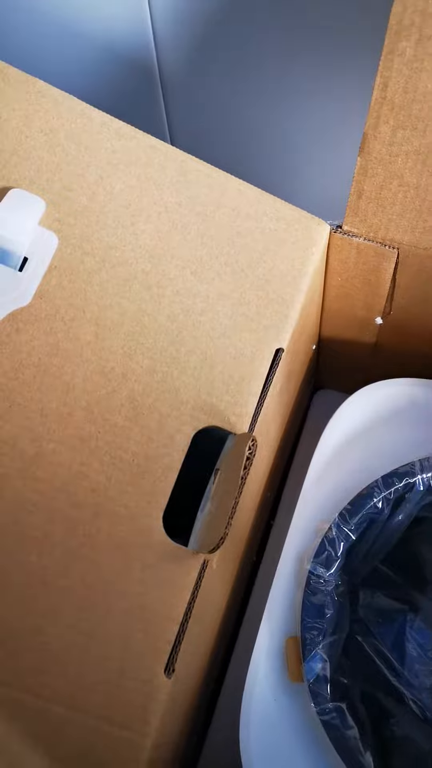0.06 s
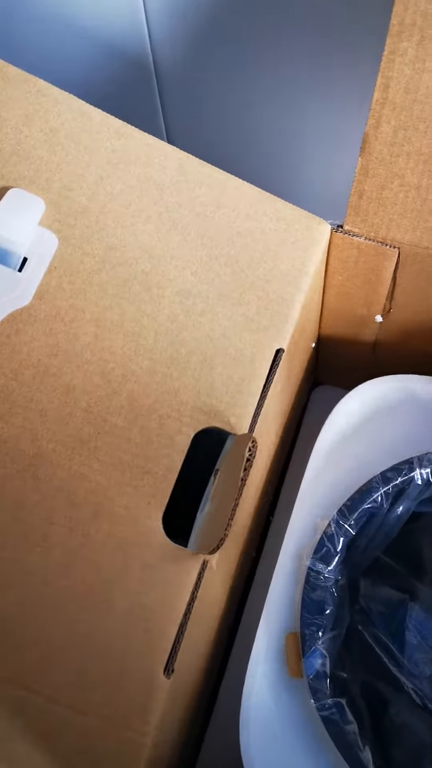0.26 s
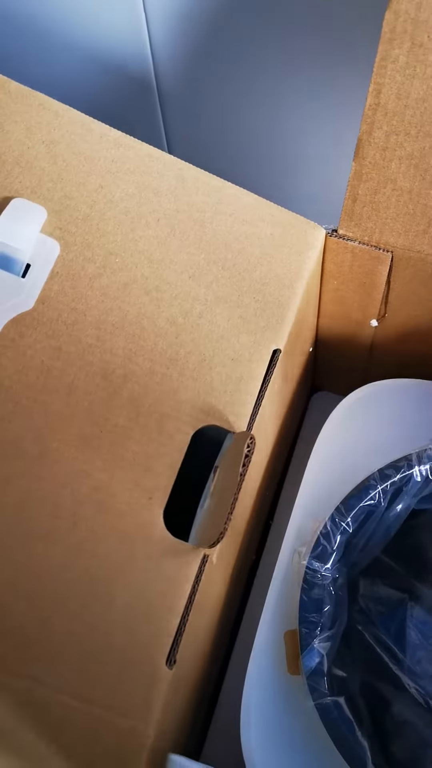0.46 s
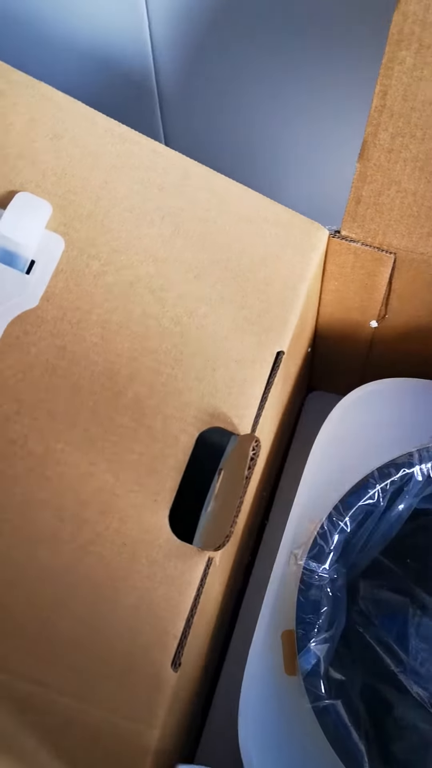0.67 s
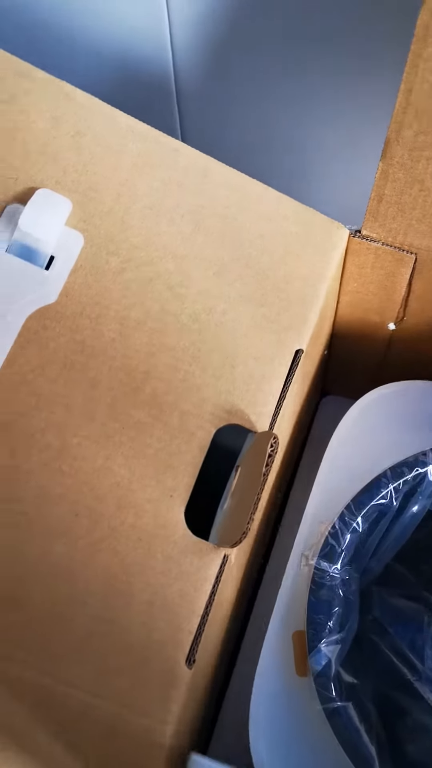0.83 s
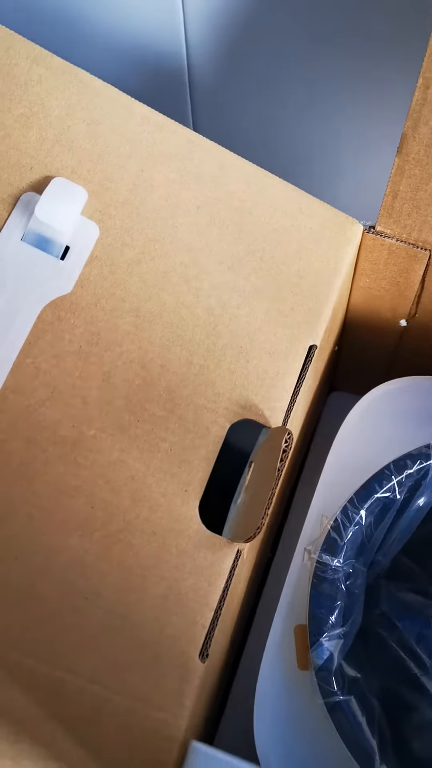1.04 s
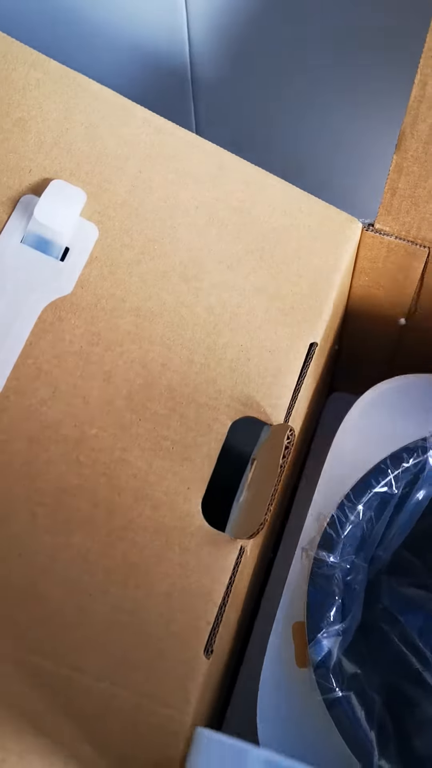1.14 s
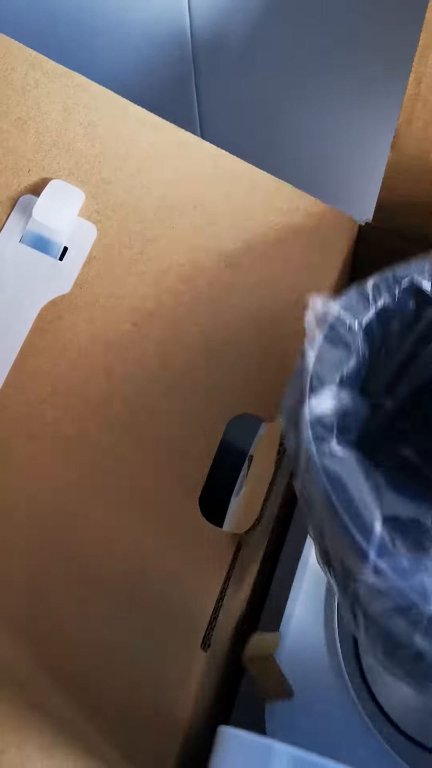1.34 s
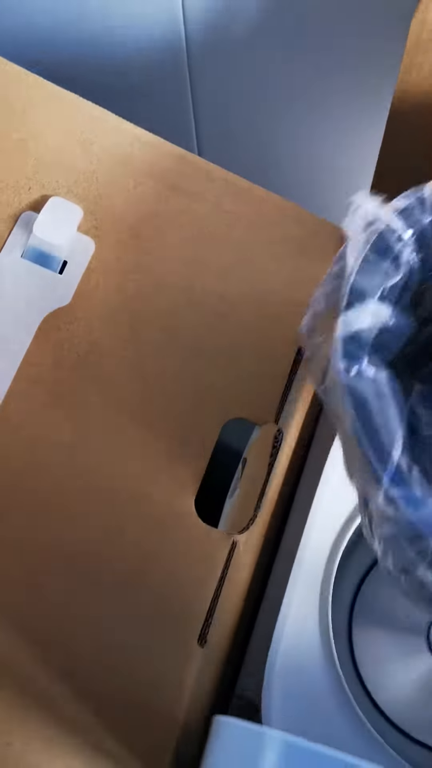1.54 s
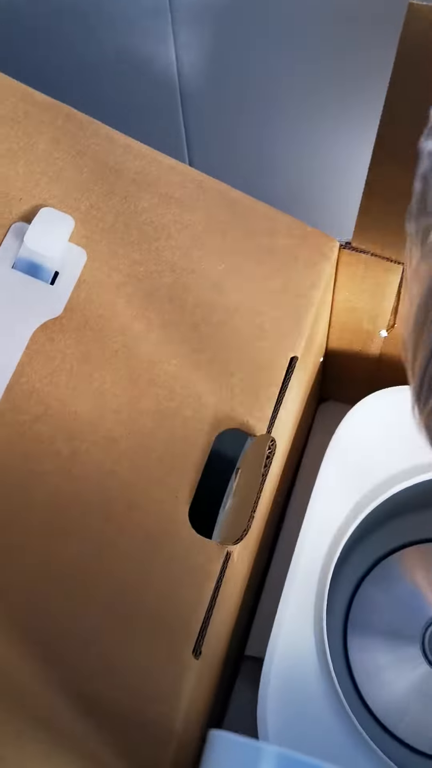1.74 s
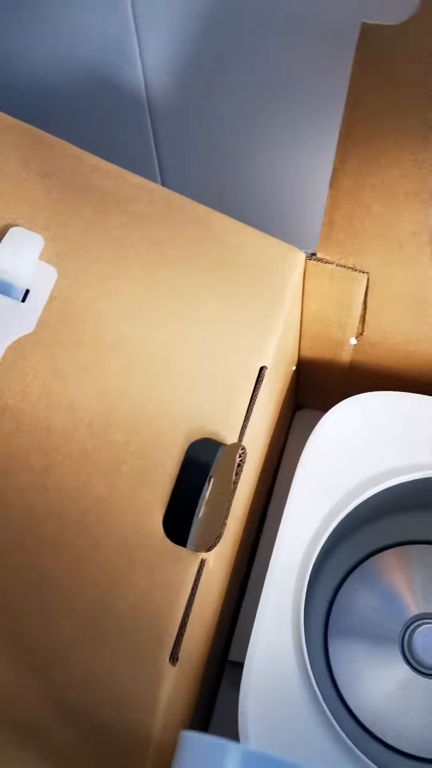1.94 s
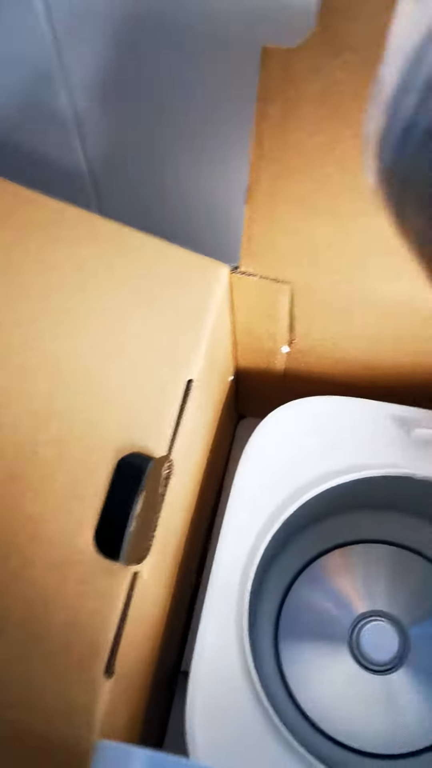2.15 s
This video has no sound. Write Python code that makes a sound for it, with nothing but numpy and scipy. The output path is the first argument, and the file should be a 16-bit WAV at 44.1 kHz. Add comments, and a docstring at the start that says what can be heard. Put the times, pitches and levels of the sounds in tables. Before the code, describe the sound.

Plastic film rustles and crackles as a hard part knocks its way out of a cardboard box.

```python
"""Unpacking an appliance part

A hard plastic part in a film bag is worked loose and lifted out of a cardboard box, close by.
The film rustles, crackles as its creases snap, and squeaks as it sticks and slips. The part knocks
against the carton and the appliance, which ring, then scrapes out past the flap. The box booms softly
when pushed. Behind it all lies a small room with a faint low hum."""
import sys
import numpy as np
from scipy import signal
from scipy.fft import irfft
from scipy.io import wavfile
from scipy.ndimage import map_coordinates

SR = 44100
rng = np.random.default_rng(int(sys.argv[2]) if len(sys.argv) > 2 else 0)


def waveform_to_disk(signal):
    """Save audio, clipped to [-1, 1], as 16-bit WAV at the path in sys.argv[1]."""
    frames = np.transpose(np.atleast_2d(signal))
    scaled = np.clip(frames, -1, 1) * 32767
    samples = np.round(scaled).astype(np.int16)
    wavfile.write(sys.argv[1], SR, samples)


N = 97020  # 2.2 seconds
T = np.arange(N) / SR
# A fade time (t60) is the seconds a sound takes to drop 60 dB. Pan is left minus right, in dB.


def amp(db):
    """Turn decibels into a gain."""
    return 10 ** (np.asarray(db) / 20)


def unit(x):
    """Scale a sound to an average (rms) level of 1."""
    return x / np.sqrt(np.mean(x ** 2) + 1e-20)


def along(points, hz):
    """Read between rows of frequency and value, on a log frequency scale."""
    freqs, values = np.transpose(points)
    return np.interp(np.log(hz + 1), np.log(freqs + 1), values)


def colour(points):
    """A tone curve (gain by frequency) from rows of Hz and dB."""
    return lambda hz: amp(along(points, hz))


def level(rows):
    """A gain for every sample from rows of seconds and dB."""
    return amp(np.interp(T, *np.transpose(rows)))


def wobble(per_s):
    """A smooth curve through per_s random values a second."""
    return map_coordinates(rng.standard_normal(int(N * per_s / SR) + 4), [T * per_s])


def add(out, start, sound, db, pan_db=0):
    """Mix a sound in at a start time in seconds, a level and a pan."""
    part = out[:, max(0, round(start * SR)):][:, :sound.shape[-1]]
    part += (sound * amp([[db + pan_db / 2], [db - pan_db / 2]]))[:, :part.shape[1]]


def noise(gain, size=N):
    """Stereo noise shaped by a tone curve; left and right are alike only in the bass."""
    # Each row: frequency in Hz, likeness of left and right from 0 to 1.
    likeness = [(120, 0.98), (300, 0.92), (600, 0.099), (1200, 0.14), (2300, 0.067), (4000, 0)]
    hz = np.fft.rfftfreq(size, 1 / SR)
    width = np.arccos(np.clip(along(likeness, hz), -1, 1)) / 2
    phases = np.exp(2j * np.pi * rng.random((2, len(hz))))
    mid, side = irfft(phases * gain(hz) * [np.cos(width), np.sin(width)], size)
    return unit(np.array([mid + side, mid - side]))


def burst(gain, t60, rise_s):
    """A click smeared by the close walls of the box: dense echoes that die fast."""
    t = T[:SR // 5]
    shape = 10 ** (-3 * t / t60) * (1 - np.exp(-t / rise_s))
    return unit(noise(gain, size=len(t)) * shape) * np.sqrt(np.mean(shape ** 2))


def pinging(gain, width_hz=250):
    """Add four random peaks to a tone curve: each small patch has resonances of its own."""
    centres_hz = rng.uniform(2000, 11000, (4, 1))
    return lambda hz: gain(hz) * (1 + amp(3.5) * np.exp(-((hz - centres_hz) / width_hz) ** 2).sum(0))


def grains(gain, per_s, spread_db, t60, spots=10):
    """Tiny clicks of uneven size from several spots."""
    out = np.zeros((2, N))
    for _ in range(spots):
        hits = rng.random(N) < per_s / spots / SR
        sizes = amp(spread_db * np.minimum(rng.exponential(size=N), 3))
        click = burst(pinging(gain), t60, rise_s=0.0001)
        out += signal.fftconvolve([hits * sizes], click, axes=1)[:, :N]
    return unit(out)


def ringing(blows, modes, rise_s, spread):
    """Each blow rings a body's own tones (modes), up to spread radians apart in left and right."""
    out, t = np.zeros((2, N)), T[:SR]
    for start, *level_and_pan in blows:
        ring = np.zeros((2, SR))
        for hz, db, t60 in modes:
            offset = rng.uniform(-spread, spread) * np.array([[.5], [-.5]])
            ring += amp(db) * 10 ** (-3 * t / t60) * np.sin(2 * np.pi * hz * t + offset)
        add(out, start, ring * (1 - np.exp(-t / rise_s)), *level_and_pan)
    return out


def background(hum_hz=30.3):
    """Quiet room air and a low hum that wavers in level."""
    # Each row: frequency in Hz, level in dB.
    air_tone = [(20, 1), (60, -4.5), (120, -10.5), (250, -18), (700, -27), (2000, -30.5), (3500, -31.5),
                (5000, -41), (9000, -44), (14000, -61)]
    air = amp(-55.5) * noise(colour(air_tone))
    hum = amp(-57.5 + 1.4 * wobble(per_s=5.6)) * unit(np.sin(2 * np.pi * hum_hz * T))
    return air + hum


def room_echo(sound):
    """The small room's echo; the treble dies first."""
    # Each row: frequency in Hz, fade time in seconds.
    fade_times = [(100, 0.46), (1000, 0.49), (6000, 0.34), (12000, 0.19)]
    hz, t, spectrum = signal.stft(noise(np.ones_like, size=SR // 2), SR, nperseg=256)
    fade = 10 ** (-3 * t / along(fade_times, hz)[:, None])
    tail = signal.istft(spectrum * fade, SR, nperseg=256)[1]
    tail = np.pad(tail / np.linalg.norm(tail[0]), ((0, 0), (SR // 150, 0)))  # arrives about 7 ms late
    return signal.fftconvolve(sound, tail, axes=1)[:, :N]


def box_boom():
    """Pushes make the whole box boom softly."""
    # Each row: start in seconds, level in dB.
    pushes = [(.01, -43.5), (.125, -46.5), (.217, -32), (.24, -30.5), (.35, -45), (.425, -41), (.765, -45),
              (.872, -40.5), (1.05, -45), (1.205, -43), (1.232, -35), (1.328, -29), (1.43, -42.5),
              (1.51, -43.5)]
    # Each row: frequency in Hz, level in dB, fade time in seconds.
    modes = [(70.1, 2.5, 0.35), (112.6, 2, 0.29), (159.5, -7, .2)]
    return ringing(pushes, modes, rise_s=0.0031, spread=0.27)


def wall_ring():
    """The carton wall gives a hollow note when struck."""
    # Each row: start in seconds, level in dB, pan in dB.
    blows = [(.2385, -21.5, -9), (1.047, -29, -8), (1.21, -45.5, -16), (1.327, -45, -8), (1.605, -37.5, -9)]
    # Each row: frequency in Hz, level in dB, fade time in seconds.
    modes = [(397.6, 2, 0.15), (485, -1, 0.13), (535.4, -6.5, 0.13), (682, 0, 0.04), (765, -7.5, 0.069),
             (1439, -8, 0.094)]
    return ringing(blows, modes, rise_s=0.00053, spread=2.1)


def flap_ring():
    """The loose flap rings briefly when knocked."""
    # Each row: start in seconds, level in dB, pan in dB.
    blows = [(1.328, -21, -2.5), (1.473, -28, 0.5), (1.6045, -26, -4.5)]
    # Each row: frequency in Hz, level in dB, fade time in seconds.
    modes = [(751, -8.5, 0.063), (909, -13, 0.057), (1009, 1.5, 0.054), (1095, -8.5, 0.12)]
    return ringing(blows, modes, rise_s=0.0018, spread=0.95)


def shell_ring():
    """The appliance's hard shell rings higher and longer than the cardboard."""
    # Each row: start in seconds, level in dB.
    blows = [(1.0472, -31.5), (1.2095, -49.5), (1.327, -50)]
    # Each row: frequency in Hz, level in dB, fade time in seconds.
    modes = [(1024, -10, .25), (1370, -9.5, .3), (1436, 12, 0.045), (2337, 22.5, 0.029), (2294, -1.5, 0.49),
             (2325, -6, .6), (3030, -11.5, 0.84), (3080, -13, 0.64), (3070, 15, 0.018), (3570, -12, 0.45),
             (3683, 19.5, 0.024), (4810, -17, .35)]
    return ringing(blows, modes, rise_s=0.0011, spread=0.47)


def scrape():
    """Rough cardboard catches and lets go as the part rubs in its seat, then slides past the flap."""
    # Each row: time in seconds, level in dB.
    rub_levels = [(0, -53), (.055, -43), (.11, -63.5), (.2, -57.5), (.3, -44.5), (.42, -46.5), (.54, -57),
                  (.6, -47), (.7, -55), (.76, -51), (.87, -48), (.94, -51.5), (1.02, -46.5), (1.3, -53.5),
                  (1.6, -100)]
    slide_levels = [(0, -78.5), (1.0, -61.5), (1.2, -44.5), (1.36, -42), (1.45, -50.5), (1.52, -38.5),
                    (1.59, -50.5), (1.66, -37), (1.74, -42.5), (1.82, -48), (1.89, -66.5), (2.2, -67)]
    # Each row: frequency in Hz, level in dB.
    rub_tone = [(100, -4), (200, -15.5), (310, -16.5), (385, -4), (530, -4.5), (720, -6), (900, -21),
                (2000, -21), (6000, -58.5)]
    slide_tone = [(100, -7.5), (190, -23.5), (238, 6), (310, -4.5), (380, 5), (460, 0.5), (570, -11.5),
                  (730, 2), (860, -0.5), (1020, 0.5), (1400, -6), (2500, -17.5), (5000, -38.5),
                  (12000, -63)]
    rub = level(rub_levels) * grains(colour(rub_tone), per_s=700, spread_db=2.5, t60=0.057)
    slide = level(slide_levels) * grains(colour(slide_tone), per_s=500, spread_db=2, t60=0.063)
    return rub + slide


def bumps():
    """The part clacks against things; harder, smaller contacts sound higher."""
    # Each row: start in seconds, level in dB, low and high edge in Hz, fade time in seconds, pan in dB.
    contacts = [(0.0282, -39, 615, 5900, 0.058, 8), (.216, -31.5, 80, 630, 0.039, -4.5),
                (.238, -19.5, 356, 1590, 0.046, -3.5), (0.2377, -18, 1270, 8200, 0.038, -0.5),
                (0.2587, -26, 294, 630, .05, -2.5), (0.488, -37, 350, 1400, .03, 9),
                (.751, -34.5, 304, 2700, 0.042, -3), (0.808, -23.5, 46, 104, 0.03, 1),
                (.826, -36.5, 255, 796, 0.05, -4.5), (1.0453, -12, 1260, 4960, 0.02, -2),
                (1.0482, -23.5, 4440, 8740, 0.02, -2), (1.2094, -23, 720, 4700, 0.058, 2),
                (1.206, -24.5, 1370, 1540, 0.036, 9), (1.265, -29.5, 194, 1080, 0.082, -5),
                (1.3247, -21, 520, 3650, 0.08, -5), (1.333, -27.5, 307, 1500, 0.15, -3),
                (1.472, -30, 580, 1550, 0.11, -2.5), (1.571, -29, 1220, 2900, 0.057, 0.5),
                (1.5752, -23, 1400, 8800, 0.034, -2), (1.604, -25.5, 314, 940, 0.066, -7),
                (1.6686, -30.5, 1740, 8240, 0.039, -2.5), (1.684, -32.5, 556, 1090, 0.081, -11.5),
                (2.0467, -32, 5100, 7900, 0.017, -5), (2.046, -43, 3300, 11000, .012, -9)]
    out = np.zeros((2, N))
    for start, db, low_hz, high_hz, t60, pan_db in contacts:
        click = burst(np.ones_like, t60, rise_s=0.00045)
        band = signal.butter(3, [low_hz, high_hz], "band", fs=SR, output="sos")
        clack = unit(signal.sosfilt(band, click)) * click.std()
        add(out, start, clack, db, pan_db)
    return out


def film_squeak(octaves_per_s=4.4, rough_octaves=0.018):
    """Film drags over the shell; where it sticks and slips evenly, it gives a short rising tone."""
    # Each row: time in seconds, level in dB.
    drag_levels = [(.513, -120), (.517, -35), (.538, -25.5), (.545, -30), (.556, -28.5), (.58, -38.5),
                   (.6, -47.5), (.66, -57), (.75, -120)]
    # Each row: frequency in Hz, level in dB.
    drag_tone = [(300, -30), (1000, -3), (1900, -2), (2700, 2), (6000, -1), (9000, 1.5), (11200, -13.5),
                 (15000, -14)]
    # Each row: middle in seconds, pitch in Hz, half length in seconds, then level, overtones, pan in dB.
    squeaks = [(0.351, 1026, .014, -36.5, -20, 2), (0.5532, 2808, .0075, -24, -13.5, 2),
               (0.559, 2810, .008, -34.5, -5.5, 6.5)]
    out = level(drag_levels) * grains(colour(drag_tone), per_s=8800, spread_db=1.5, t60=0.016, spots=4)
    for middle, hz, half_s, db, overtone_db, pan_db in squeaks:
        glide = octaves_per_s * np.clip(T - middle, -half_s, half_s)
        pitch_hz = hz * 2 ** (glide + rough_octaves * wobble(per_s=400))
        phase = 2 * np.pi * np.cumsum(pitch_hz) / SR
        tone = np.sin(phase + np.array([[.5], [-.5]]))  # left and right slightly out of step
        overtones = sum(np.sin(k * phase + 2 * np.pi * rng.random((2, 1))) for k in (2, 3, 4))
        swell = np.exp(-((T - middle) / half_s) ** 2)
        add(out, 0, (tone + amp(overtone_db) * overtones) * swell, db, pan_db)
    return out


def film_pop(start=1.5755, centre_hz=8440, width_hz=830):
    """Stretched film lets go with a high bite and a short, fuzzy ring."""
    # The bite, then the ring. Each row: level in dB, fade time in seconds.
    stages = [(-26, .018), (-43.5, .2)]
    out = np.zeros((2, N))
    for db, t60 in stages:
        pop = burst(lambda hz: np.exp(-((hz - centre_hz) / width_hz) ** 2), t60, rise_s=0.00025)
        add(out, start, pop, db)
    return out


def film_rustle():
    """Many small creases blur into a fluttering hiss and a fine crackle."""
    # Each row: time in seconds, level in dB.
    handling = [(0, -45.5), (.08, -57.5), (.125, -50.5), (.19, -60.5), (.22, -44), (.3, -51.5), (.38, -45),
                (.42, -53), (.46, -53), (.62, -46.5), (.72, -51), (.77, -46.5), (.85, -53.5), (.91, -53),
                (.945, -43.5), (.98, -48), (1.12, -46.5), (1.2, -38.5), (1.245, -37.5), (1.31, -45),
                (1.36, -42), (1.39, -46.5), (1.44, -47), (1.5, -53), (1.56, -60.5), (1.68, -55),
                (1.82, -62), (1.88, -78), (2.0, -100)]
    # Each row: frequency in Hz, level in dB.
    film_tone = [(150, -12), (500, -8), (1000, -10), (1600, 4), (3000, 5), (6500, 2), (9000, 3.5),
                 (11500, -18), (15000, -20)]
    hiss = amp(-2.5 + 2.5 * wobble(per_s=69.2)) * noise(colour(film_tone))
    crackle = amp(-1.5) * grains(colour(film_tone), per_s=330, spread_db=3, t60=0.018)
    return level(handling) * (hiss + crackle)


def film_snaps(vary_db=3):
    """Single creases snap over, each with a tone of its own."""
    # Each row: start in seconds, level in dB, pan in dB.
    snaps = [(0.0287, -44, -1), (0.0632, -38.5, 3), (.1072, -32, 6.5), (0.1277, -35, 3), (0.1635, -35.5, 5),
             (0.167, -33, 2), (0.212, -41, 6), (.412, -27.5, 5), (0.4886, -40, 3), (0.649, -35.5, 1),
             (0.6766, -31, 2), (.688, -33.5, 0), (.7098, -37, 5), (0.7366, -30.5, 3), (0.7509, -30, 6),
             (0.766, -35.5, 4), (0.7864, -36, 1), (.826, -28.5, 2), (.841, -34.5, 9), (.851, -34.5, 1),
             (.86, -33, 4), (0.9587, -31, 5), (0.9657, -30.5, -0.5), (.982, -38, 8), (1.008, -30.5, 5),
             (1.136, -31, 1), (1.15, -37, 0), (1.1747, -33.5, 5.5), (1.2091, -24.5, -6), (1.235, -29.5, 9),
             (1.243, -27.5, 5), (1.256, -28, 3), (1.286, -34, 5), (1.328, -35, 2), (1.352, -33, 4),
             (1.363, -31, 11), (1.412, -42, 7.5), (1.4574, -39, 0), (1.4784, -33.5, 8), (1.4934, -32, 2.5),
             (1.508, -31, 1), (1.727, -39, 1.5), (1.743, -41.5, 5), (1.798, -43.5, 1.5)]
    # Each row: frequency in Hz, level in dB.
    crease_tone = [(200, -24), (900, -8.5), (2500, -1), (5000, -1), (9000, 2.5), (11500, -12.5),
                   (15000, -19.5)]
    out = np.zeros((2, N))
    for start, db, pan_db in snaps:
        own_tone = [(hz, tone_db + rng.normal(0, vary_db)) for hz, tone_db in crease_tone]
        snap = burst(pinging(colour(own_tone)), t60=0.031, rise_s=0.00025)
        add(out, start, snap, db, pan_db)
    return out


def scene():
    """Mix the close sounds and their echo with the box's boom and the background."""
    film = film_rustle() + film_snaps() + film_pop() + film_squeak()
    near = film + bumps() + scrape() + wall_ring() + shell_ring() + flap_ring()
    return near + amp(-10) * room_echo(near) + box_boom() + background()


def record(dry, top_hz=15000):
    """Cut away the highest treble with a steep filter."""
    return signal.sosfilt(signal.ellip(10, .1, 90, top_hz, fs=SR, output="sos"), dry)


dry = scene()
out = record(dry)
waveform_to_disk(out)
```